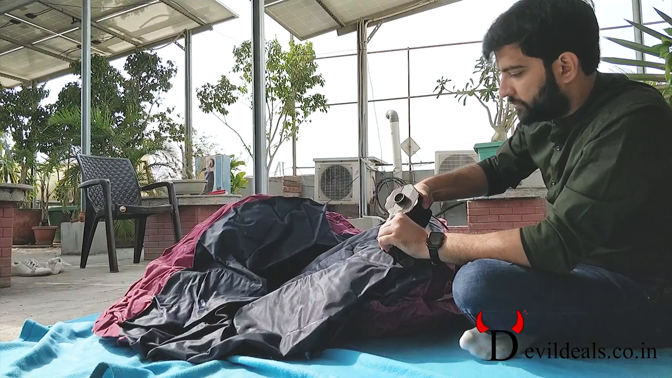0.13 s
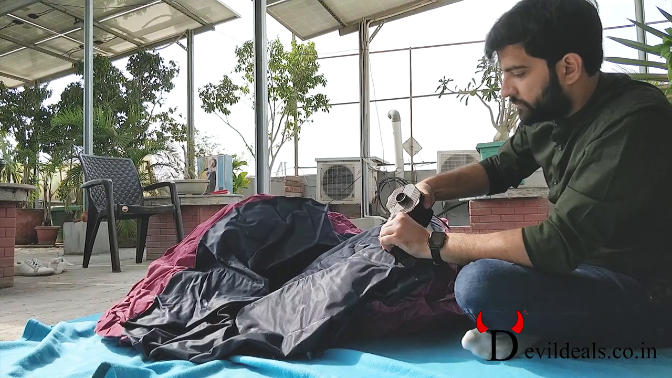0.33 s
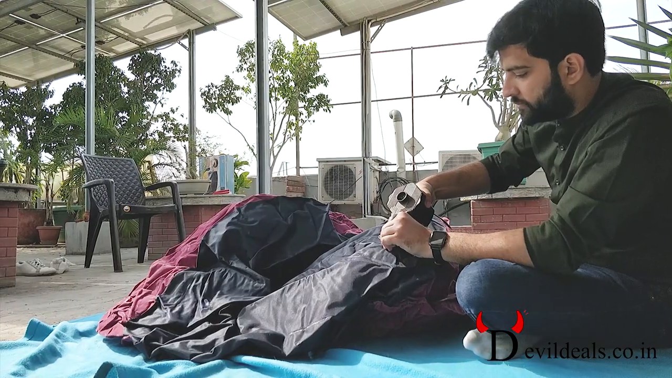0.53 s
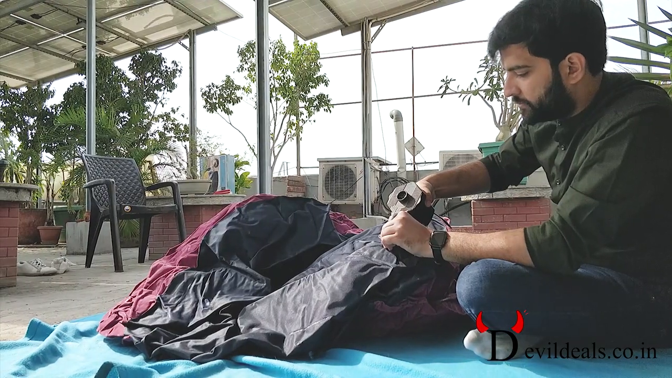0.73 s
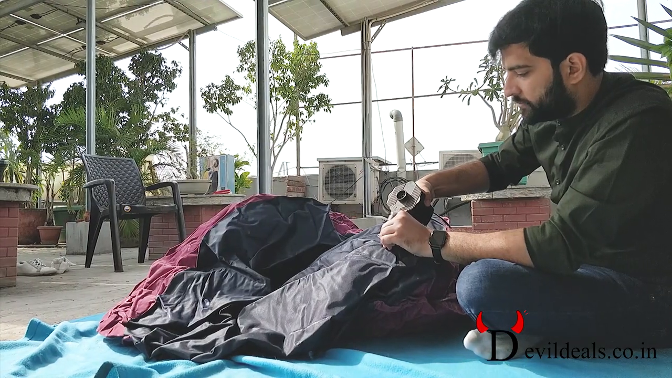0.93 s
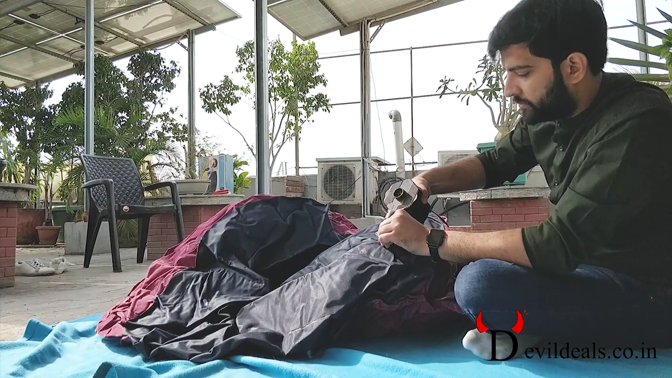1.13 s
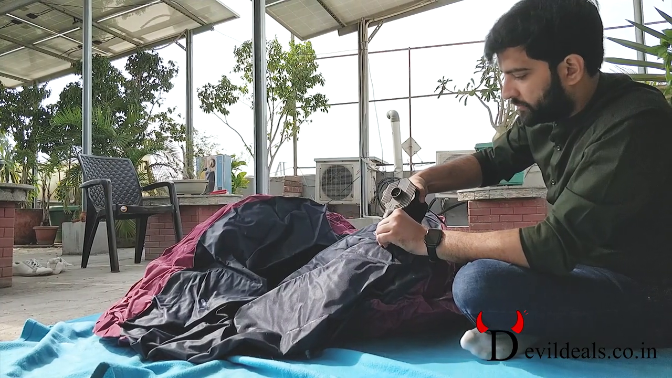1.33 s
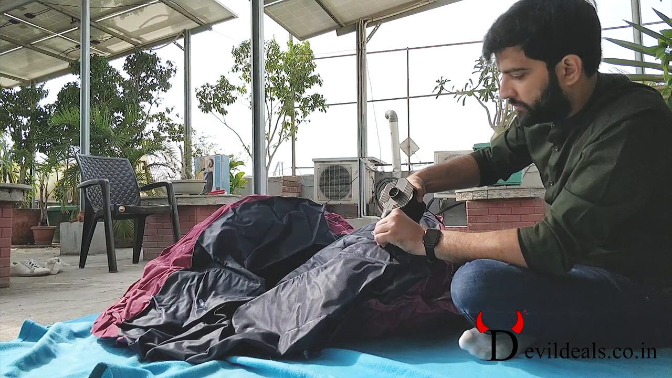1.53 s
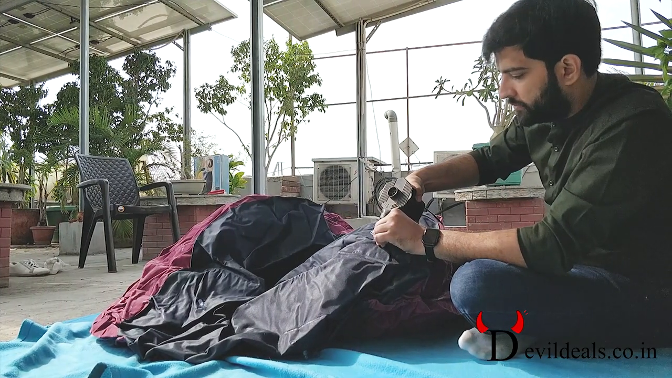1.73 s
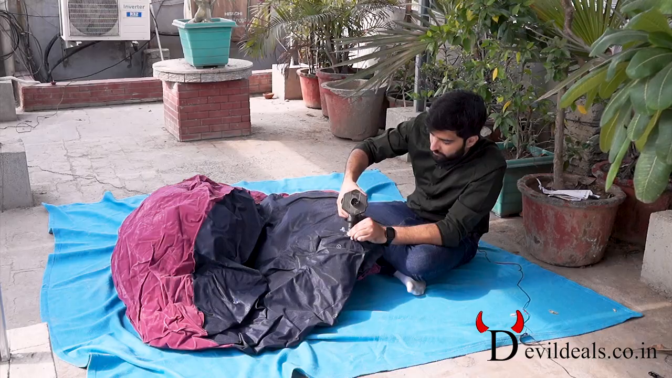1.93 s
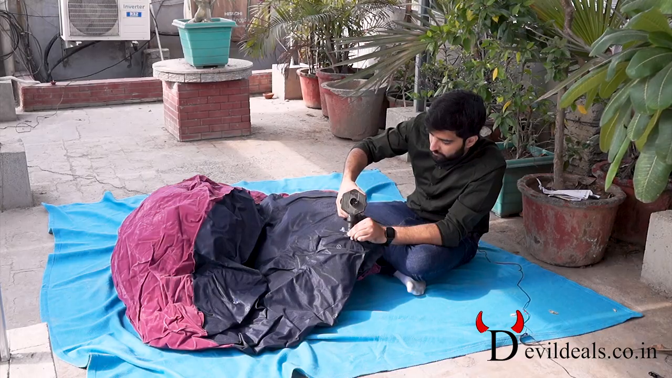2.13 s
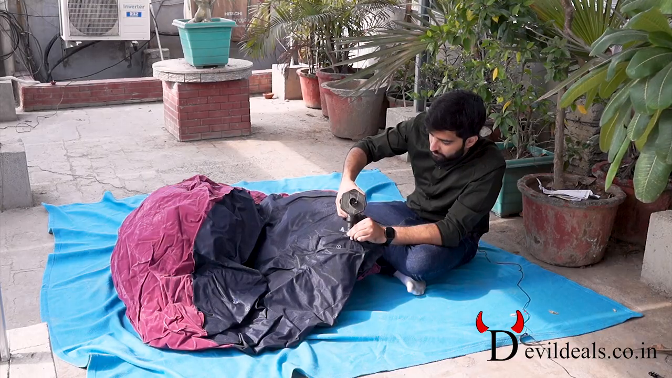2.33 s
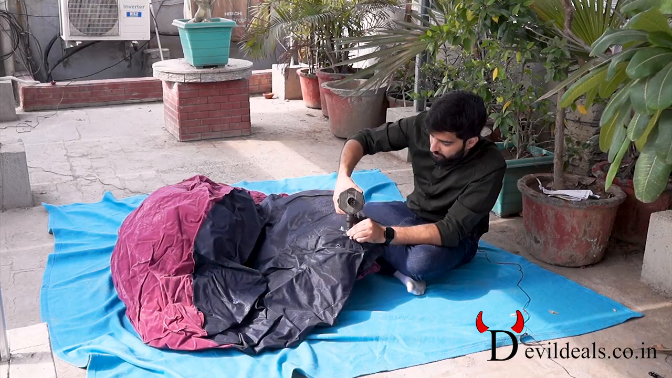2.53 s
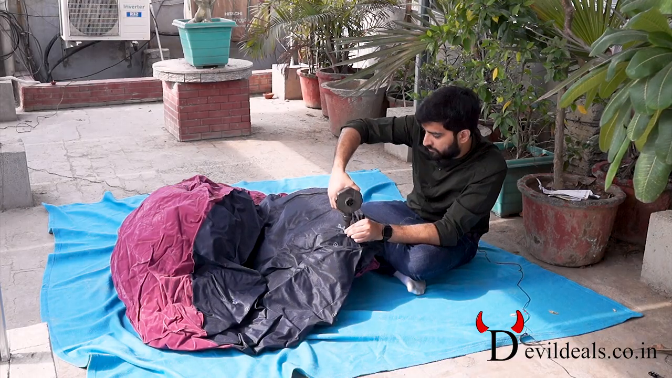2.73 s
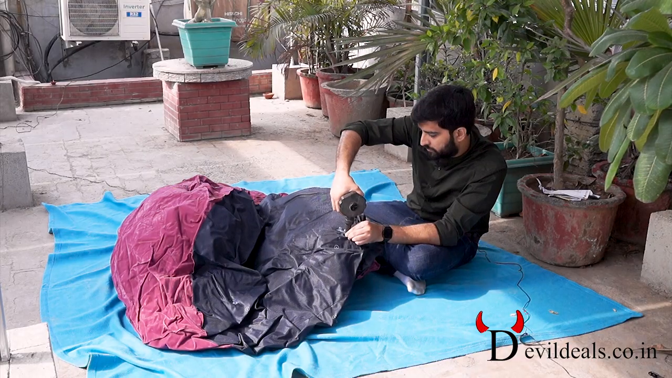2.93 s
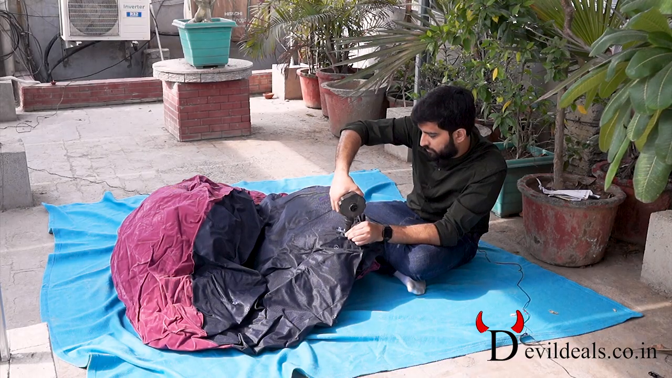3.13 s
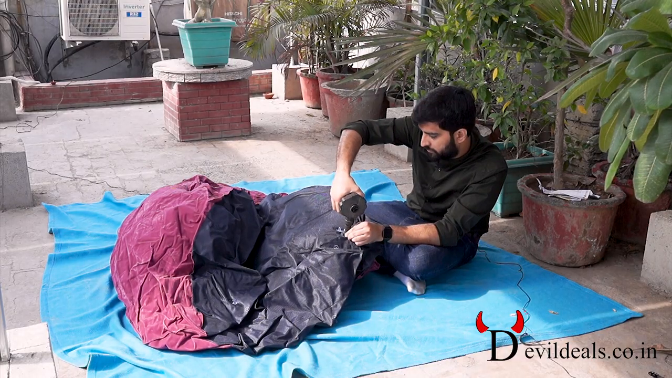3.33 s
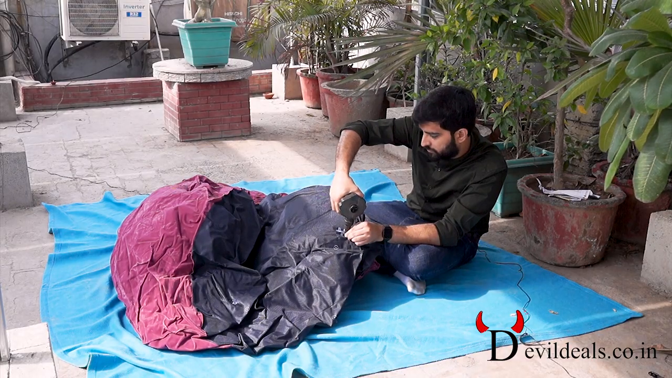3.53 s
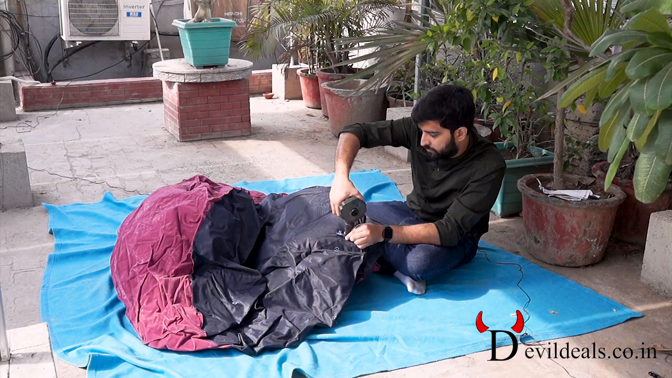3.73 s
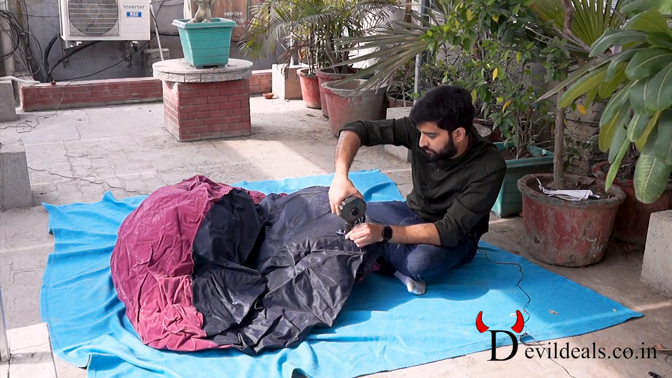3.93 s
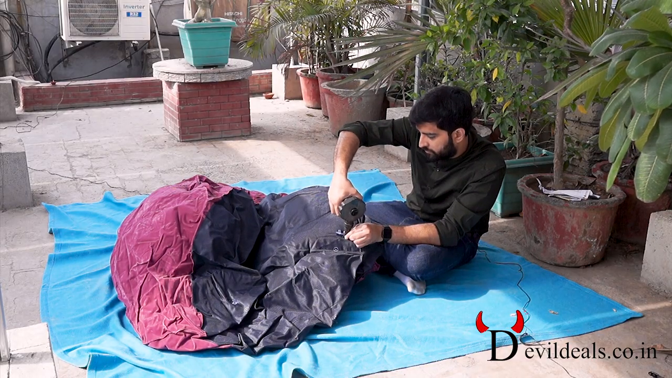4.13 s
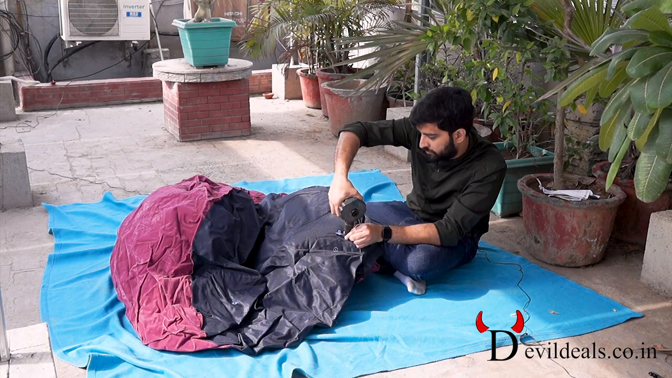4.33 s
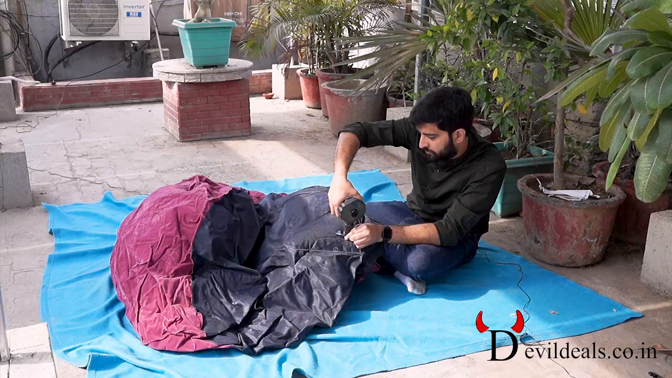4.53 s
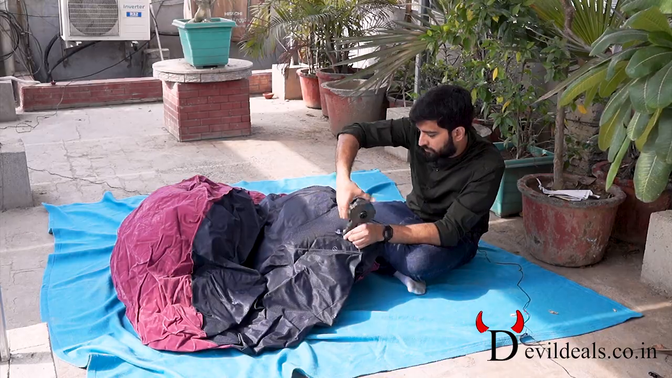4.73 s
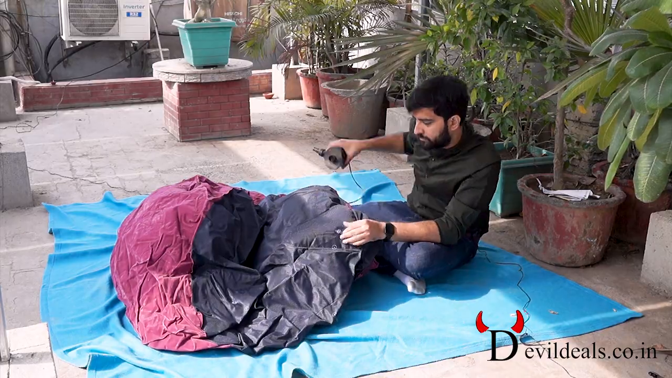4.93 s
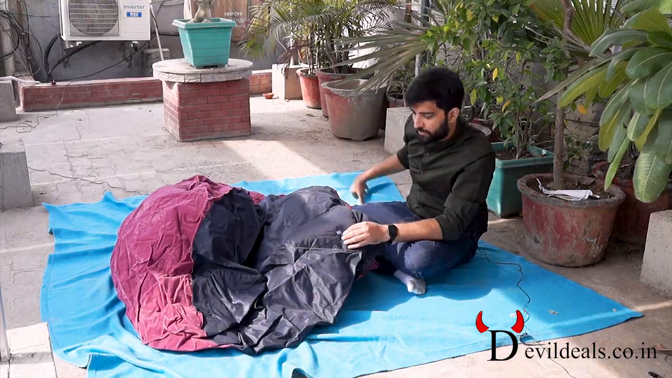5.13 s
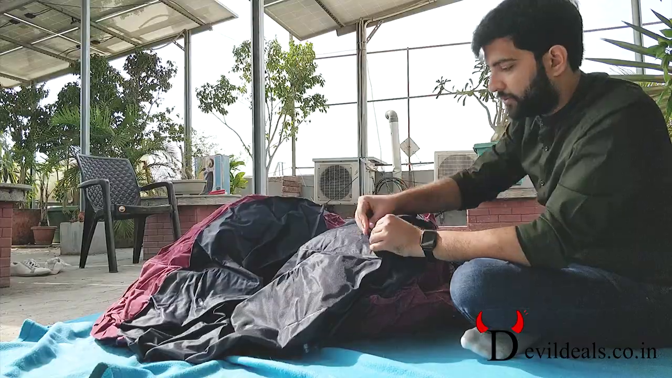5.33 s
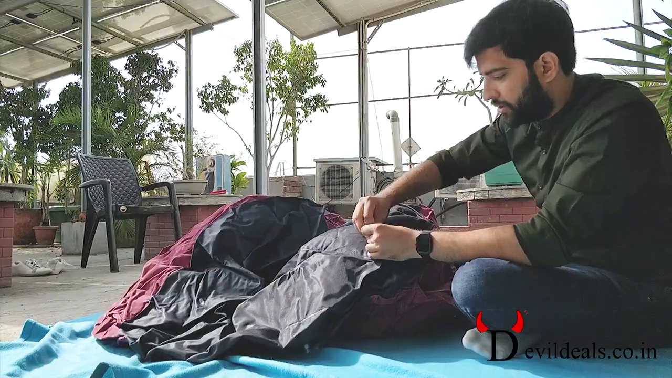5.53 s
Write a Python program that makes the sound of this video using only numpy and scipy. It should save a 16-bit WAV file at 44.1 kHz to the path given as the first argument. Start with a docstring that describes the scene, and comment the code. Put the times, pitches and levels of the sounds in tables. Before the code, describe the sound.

From the start a handheld electric air pump runs close by on an open terrace, pushing air into an inflatable chair: a dense, bright, steady hiss with a thin, slightly fluttering whine of stacked motor tones. Distant traffic lies far beneath, including a low engine tone sagging in the first half second, mostly masked. From about 2.5 s the pump is tilted and the colour gradually shifts, the air more focused and the whine clearer and marginally higher. At about 4.8 s the motor is switched off: the whine collapses, the rush drops away, and a scratchy, sinking rasp fades within roughly half a second, mixed with short puffs of air and vinyl rustle. A sharp plastic snap comes at 5.14 s, a faint click near 5.3 s, and two more valve clicks around 5.6 s, over soft traffic murmur. The sound is dry, the same in both channels, with the extreme top removed.

```python
"""Electric pump on a terrace

A handheld pump blows air into an inflatable chair: shaped noise for the hiss, shaft harmonics for the whine.
The colour shifts as the pump is held at another angle. Switched off, it coasts down with a rasp of
resonant noise. Noise bursts are escaping air and rustling vinyl, filtered snaps the clicks of the valve.
Far traffic lies beneath: a wash of noise, narrow drones and one sagging engine tone."""
import sys
import numpy as np
from scipy import signal
from scipy.fft import rfft, irfft
from scipy.io import wavfile

SR = 44100
rng = np.random.default_rng(int(sys.argv[2]) if len(sys.argv) > 2 else 0)


def master(y):
    """Save y as 16-bit WAV."""
    cut = np.clip(np.atleast_2d(y).T, -1, 1)
    pcm = np.round(cut * 32767)  # scale
    wavfile.write(sys.argv[1], SR, pcm.astype(np.int16))


N = 250929
T = np.arange(N) / SR  # s
FREQ = np.fft.rfftfreq(N, 1 / SR)  # Hz
OFF_S = 4.782  # the motor is switched off


def undb(db):
    """Decibels to gain."""
    return 10 ** (np.asarray(db) / 20)


def unit(x):
    """Scale to rms 1."""
    return x / np.sqrt(np.mean(x ** 2))


def noise():
    """White noise."""
    return rng.standard_normal(N)


def walk(rate_hz):
    """Smooth random drift of rms 1, its faster movement rolled off around rate_hz."""
    smoothing = 1 + (FREQ / rate_hz) ** 2
    return unit(irfft(rfft(noise()) / smoothing, N))


def colour(x, points):
    """Equalise x through (f/Hz, level/dB) points, joined on a log frequency axis; rms 1."""
    hz, db = np.transpose(points)
    gain_db = np.interp(np.log(FREQ + 1), np.log(hz), db)
    return unit(irfft(rfft(x) * undb(gain_db), N))


def resonate(x, hz, width):
    """One resonance, gain 1 at its centre."""
    damping = 1j * FREQ * width
    return irfft(rfft(x) * damping / (hz ** 2 - FREQ ** 2 + damping), N)


def band(hz, width):
    """Noise through the same resonance twice, for steeper sides; rms 1."""
    once = resonate(noise(), hz, width)
    return unit(resonate(once, hz, width))


def swell(s, length, db):
    """A bell-shaped rise and fall of gain, peaking at s; length is the bell's standard deviation."""
    return undb(db) * np.exp(-.5 * ((T - s) / length) ** 2)


def ramp(s, length):
    """From 0 at s to 1 a length later."""
    return np.clip((T - s) / length, 0, 1)


def bursts(rows):
    """Soft bursts of noise, each in its own band."""
    return sum(band(hz, width) * swell(s, length, db) for s, length, db, hz, width in rows)


def pump(air_power=4.5):
    """Hiss and whine change colour as the pump tilts, then die away after switch-off, leaving the rasp."""
    air_db = -26.5  # air through the nozzle at full speed
    turn_s, turn_lag_s = 2.45, 0.84  # start of the tilt into the second grip, and its time constant
    whine_fade_s = .025  # time constant of the whine's collapse once the power is off
    hz, speed = shaft()
    angle = 2 * np.pi * np.cumsum(hz) / SR
    turn = 1 - np.exp(-np.maximum(T - turn_s, 0) / turn_lag_s)  # 0 first grip, 1 second
    air = hiss(turn, angle) * undb(air_db) * speed ** air_power
    tones = whine(turn, angle) * np.exp(-np.maximum(T - OFF_S, 0) / whine_fade_s)
    return air + tones + rasp(angle)


def shaft(wobble=0.00037, flutter=0.000703):
    """Shaft rate in Hz, and the share of full speed left as drag brakes the rotor."""
    # motor under power: t/s, shaft rate f/Hz
    powered = [(0.15, 397.6), (1.0, 398.8), (1.35, 398.1), (2.1, 397.9), (2.5, 401.2), (2.9, 404.3),
               (3.25, 404.8), (3.6, 404.4), (4.15, 406.3), (4.6, 407.0)]
    coast_s = .25  # the speed has halved this long after switch-off
    speed = 1 / (1 + np.maximum(T - OFF_S, 0) / coast_s)
    s, hz = np.transpose(powered)
    unsteady = 1 + wobble * walk(15.0) + flutter * walk(103)
    return np.interp(T, s, hz) * speed * unsteady, speed


def hiss(turn, angle, gust_db=0.27, eddy_db=0.37, chop=0.028, echo=0.055, echo_s=0.0021):
    """Turbulent air in impeller and nozzle, swelling with eddies and once a turn."""
    # spectrum of the air in the first grip: f/Hz, relative level/dB
    first_grip = [(300, -35.5), (1050, -27.5), (1650, -15.5), (2100, -3.5), (2750, 0), (3450, -4.5),
                  (3950, -10), (5300, -4.5), (6450, -5), (7400, -9.5), (11300, -6.5), (12400, -9),
                  (13150, -3.5), (14000, -11), (15700, -8)]
    # spectrum of the air in the second grip: f/Hz, relative level/dB
    second_grip = [(300, -39.5), (1050, -31), (1720, -16.5), (2150, -2), (2550, 2.5), (3400, -4.5),
                   (4150, -10), (5350, -1.5), (6100, -10), (6450, -5.5), (7900, -9.5), (11200, -13),
                   (13300, -6), (15700, -15.5)]
    first = colour(noise(), first_grip)
    second = colour(noise(), second_grip)
    # the floor reflects it, rippling the spectrum
    second = unit(second + echo * np.interp(T - echo_s, T, second))
    air = np.sqrt(1 - turn) * first + np.sqrt(turn) * second  # equal-power crossfade
    turbulence = undb(gust_db * walk(18.0) + eddy_db * walk(150))
    return air * turbulence * (1 + chop * np.cos(angle))


def whine(turn, angle, blade_waver=0.032, waver_rate=30, top_drift_db=1.5):
    """Shaft harmonics; the blade tone is clean, the high ones flicker in the turbulence and drift with the hand."""
    # harmonics: multiple of the shaft rate (sounded at the nearest whole one),
    # first grip level/dB, second grip level/dB
    harmonics = [(1, -65.5, -69), (3.987, -49, -41.5), (8, -47.5, -40), (9, -52.5, -51), (12, -43, -42.5),
                 (16, -45.5, -47), (22, -43.5, -44), (24, -46, -49), (26, -44, -50), (30, -54, -57),
                 (32, -51, -49), (33, -48, -59), (36, -50, -58)]
    out = 0
    for multiple, first_db, second_db in harmonics:
        height = multiple / harmonics[-1][0]  # 1 at the top harmonic
        waver = blade_waver + .4 * np.sqrt(height) * (multiple > 4)
        phase = round(multiple) * angle + rng.uniform(0, 2 * np.pi)
        # wavering both parts moves level and phase
        in_phase = (1 + waver * walk(waver_rate)) * np.cos(phase)
        quadrature = waver * walk(waver_rate) * np.sin(phase)
        grip_db = first_db + turn * (second_db - first_db)
        drift_db = top_drift_db * height * walk(2.1)
        out = out + unit(in_phase + quadrature) * undb(grip_db + drift_db)
    return out


def town(swell_db=0.37, rumble_swell_db=0.5):
    """Far traffic as a wash of noise, with hum, drones and one engine standing out of it."""
    # spectrum of the wash: f/Hz, relative level/dB
    wash_points = [(30, -37), (120, -26), (190, -0.5), (330, 3), (480, -1), (620, -3), (900, -6),
                   (1400, -12.5), (2800, -13.5), (5500, -12.5), (9000, -19.5), (15500, -21.5)]
    # faint drones that swell and fade: t/s, bell length/s, peak level/dB, centre f/Hz, width per pass/Hz
    drones = [(.77, 0.053, -57.5, 328, 40), (.86, 0.016, -43, 315, 24), (1.75, 0.18, -56.5, 338, 57),
              (2.15, 0.18, -58, 766, 200), (3.45, 0.13, -60, 204, 9.8), (4.02, 0.065, -58.5, 327, 39),
              (5.5, 0.37, -61.5, 424, 180)]
    wash = colour(noise(), wash_points) * undb(-54 + swell_db * walk(10.0))
    rumble = band(333, 57) * undb(-68 + rumble_swell_db * walk(2))  # gently swelling drone
    hum = band(729, 39) * undb(-67.5)  # steady and faint
    return wash + rumble + hum + far_engine() + bursts(drones)


def far_engine(waver_db=1.0):
    """A low tone of wavering level that sags in pitch as it swells and fades."""
    # engine swells: t/s, bell length/s, peak level/dB
    engine_swells = [(0, 0.032, -47.5), (0.121, 0.026, -43.5), (.19, 0.028, -45), (.42, 0.1, -62.5)]
    start_hz, end_hz, sag_s = 218, 179, .27  # pitch settles with time constant sag_s
    hz = end_hz + (start_hz - end_hz) * np.exp(-T / sag_s)
    tone = unit(np.sin(2 * np.pi * np.cumsum(hz) / SR))
    gain = sum(swell(s, length, db) for s, length, db in engine_swells)
    return tone * gain * undb(waver_db * walk(16))


def puffs():
    """Escaping air and sliding plastic and vinyl: turbulence and friction as short bursts of banded noise."""
    # t/s, bell length/s, peak level/dB, centre f/Hz, width per pass/Hz
    puff_rows = [(2.6, 0.044, -36, 12000, 121), (4.765, 0.018, -32, 10700, 1200),
                 (4.808, 0.008, -32, 7600, 600), (4.85, 0.014, -27.5, 7100, 16300),
                 (4.885, 0.027, -38, 14600, 2970), (4.995, 0.015, -46, 3330, 500),
                 (5.01, 0.022, -35, 6300, 700), (5.04, 0.037, -37, 13500, 4500),
                 (5.21, 0.033, -52, 6100, 800), (5.258, 0.0093, -50, 910, 280),
                 (5.316, 0.014, -47.5, 6600, 14200), (5.61, .05, -63, 12160, 297)]
    return bursts(puff_rows)


def rasp(angle, chatter_db=0.1, flicker_db=2.5, size=176):
    """Brushes scrape a rough track, partly alike on each turn, so its partials sink as the rotor slows."""
    # housing resonances rung by the scrape: f/Hz, half the width of each pass/Hz, relative level/dB
    housing = [(3350, 2600, -9.5), (4370, 820, -1), (6070, 840, 4), (8160, 1400, -1.5), (10100, 670, -2),
               (11960, 890, 6.5), (14800, 880, 0)]
    level_db, attack_s = -29, 0.089
    hold_s, fade_db_per_s = 0.12, 76  # the fade starts hold_s after switch-off
    silent_s, release_s = 5.35, 0.061  # the rasp is gone at silent_s
    roughness = rng.standard_normal(size)  # points round the track
    track = np.interp(angle / (2 * np.pi) * size, np.arange(size), roughness, period=size)
    scrape = (track + 1.1 * noise()) * undb(chatter_db * walk(60))
    ring = 0
    for k, (hz, half_width, db) in enumerate(housing):
        once = resonate(scrape, hz, 2 * half_width)
        mode = resonate(once, hz, 2 * half_width)
        ring = ring + (-1) ** k * undb(db + flicker_db * walk(25)) * mode  # neighbours in opposite polarity
    fade_db = fade_db_per_s * np.maximum(T - OFF_S - hold_s, 0)
    coasting = ramp(OFF_S, attack_s) * (1 - ramp(silent_s - release_s, release_s))
    return unit(ring) * undb(level_db - fade_db) * coasting


def clicks(crackle=0.17):
    """Plastic of nozzle and valve: a sharp snap with a brief crackle after it, ringing the valve body."""
    # t/s, peak level/dB, crackle decay/s, low f/Hz, high f/Hz, ring of the valve body/dB
    click_rows = [(5.1365, -24, 0.0035, 480, 7500, -9), (5.304, -39, 0.0022, 494, 8000, -9),
                  (5.576, -41, .003, 800, 5000, -13), (5.6383, -30.5, 0.00058, 900, 3800, -12)]
    # valve body resonances: f/Hz, width/Hz, level before the click's own ring level is added/dB
    valve = [(900, 160, 19), (1230, 140, 9)]
    out = 0
    for s, db, decay, low_hz, high_hz, ring_db in click_rows:
        snap = crackle * noise() * (T >= s) * np.exp(-np.abs(T - s) / decay)
        snap[int(s * SR)] += 1
        bandpass = signal.butter(2, [low_hz, high_hz], "band", fs=SR, output="sos")
        snap = signal.sosfilt(bandpass, snap)
        body = sum(undb(mode_db + ring_db) * resonate(snap, hz, width) for hz, width, mode_db in valve)
        snap = snap + body
        out = out + snap * undb(db) / np.abs(snap).max()
    return out


def scene():
    """Pump, handling and town, the same in both channels."""
    mono = pump() + town() + puffs() + clicks()
    return np.array([mono, mono])


def record(dry):
    """The recorder cuts the top steeply."""
    top_hz = 15700
    lowpass = signal.ellip(12, .1, 85, top_hz, fs=SR, output="sos")  # 0.1 dB ripple, 85 dB rejection
    return signal.sosfilt(lowpass, dry)


dry = scene()
out = record(dry)
master(out)
```